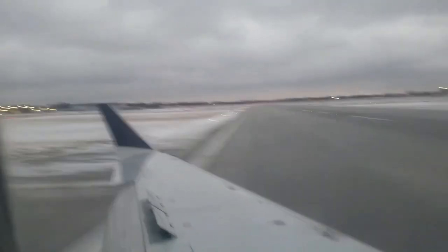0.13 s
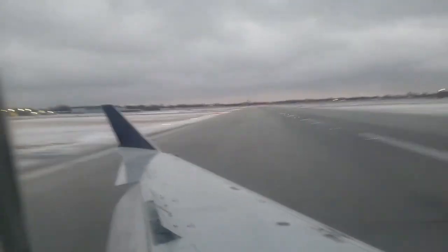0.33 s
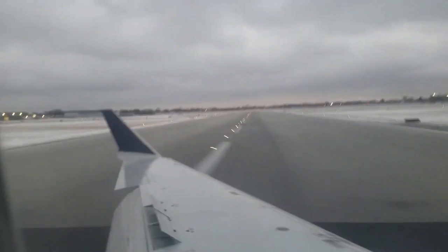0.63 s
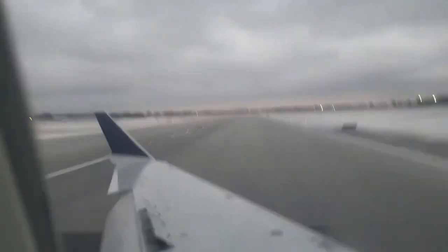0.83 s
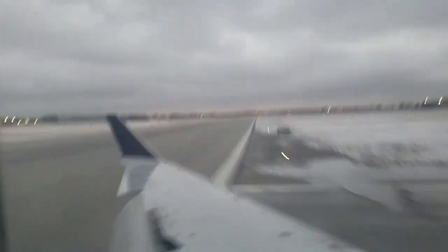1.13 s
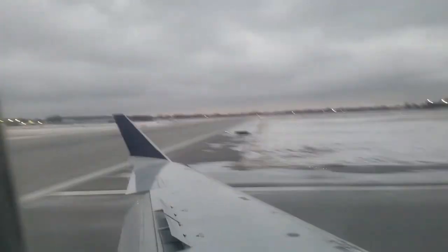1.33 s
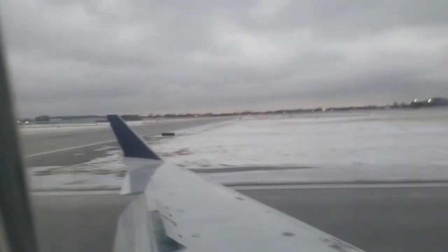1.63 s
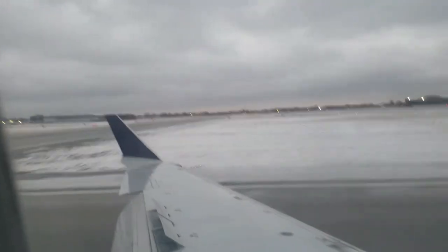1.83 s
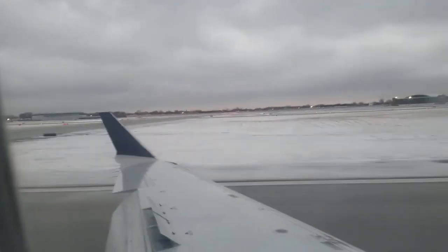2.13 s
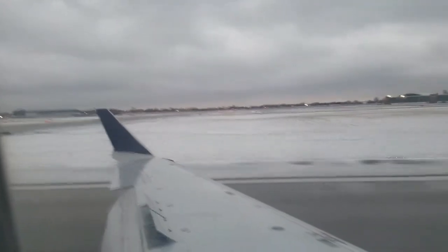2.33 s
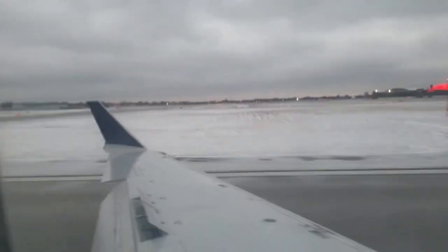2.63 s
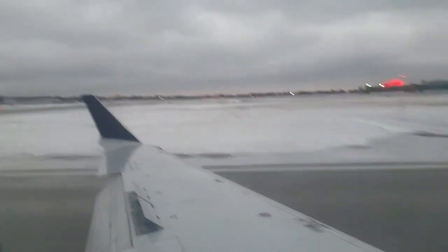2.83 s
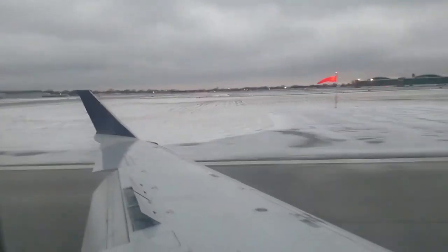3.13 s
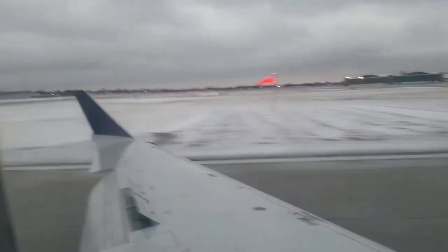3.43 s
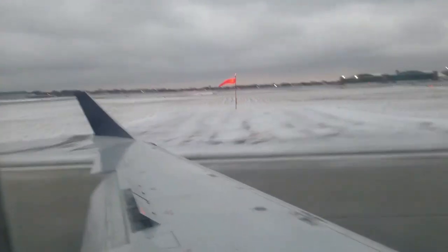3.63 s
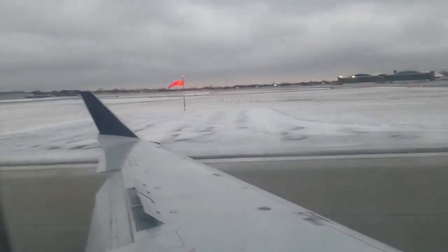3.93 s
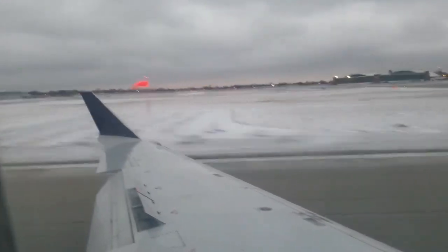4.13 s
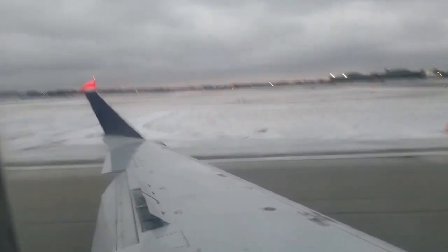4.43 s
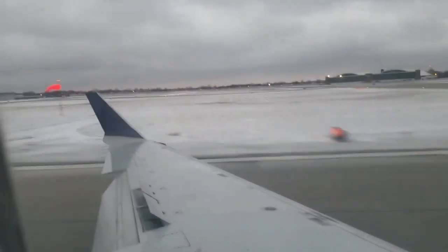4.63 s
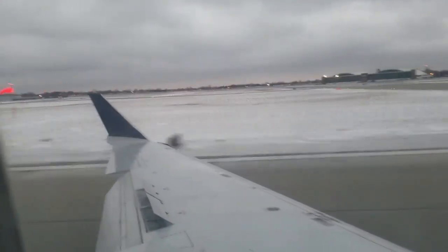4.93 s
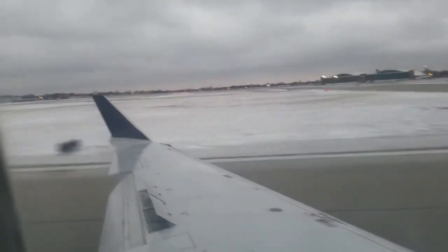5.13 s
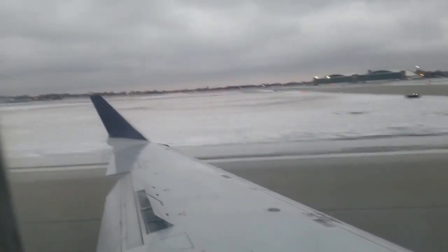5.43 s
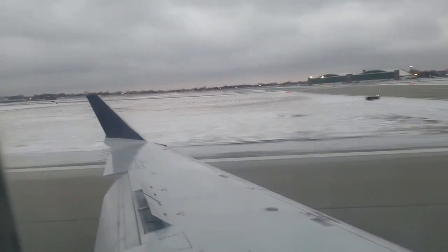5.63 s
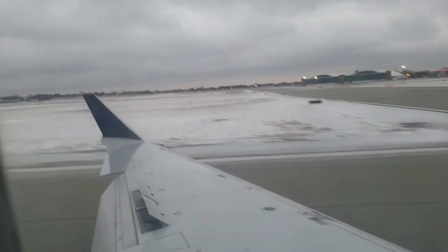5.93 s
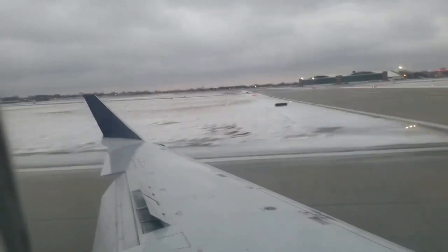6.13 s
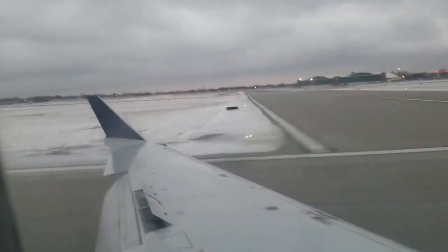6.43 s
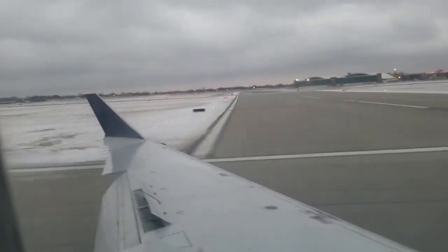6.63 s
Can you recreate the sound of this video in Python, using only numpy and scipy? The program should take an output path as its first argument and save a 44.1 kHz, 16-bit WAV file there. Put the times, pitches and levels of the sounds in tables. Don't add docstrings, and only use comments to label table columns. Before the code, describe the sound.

Deep rolling rumble and sinking wheel drone in an aircraft cabin, vents hissing, machinery whining in slow beats, a sharp jolt at 1.2 seconds.

```python
import sys
import numpy as np
from scipy import signal
from scipy.fft import rfft, irfft, next_fast_len
from scipy.io import wavfile
from scipy.ndimage import uniform_filter1d, map_coordinates

SR = 44100
rng = np.random.default_rng(int(sys.argv[2]) if len(sys.argv) > 2 else 0)


def gain_from_db(level_db):
    decades = np.asarray(level_db, float) / 20
    return 10 ** decades


def to_wav(sig):
    pcm = np.clip(np.atleast_2d(sig), -1, 1) * 32767
    pcm = np.round(pcm).astype(np.int16)
    wavfile.write(sys.argv[1], SR, pcm.T)


N = 298557


def unit(x):
    return x / np.sqrt(np.mean(x ** 2) + 1e-20)


def along(points, hz):
    f, v = np.transpose(points)
    return np.interp(np.log(hz + 1), np.log(f + 1), v)


def spectrum(points):
    return lambda hz: gain_from_db(along(points, hz))


def curves(rows):
    s, *cols = np.transpose(rows)
    return [np.interp(np.arange(N) / SR, s, c) for c in cols]


def wobble(rate):
    at = np.arange(0, N + 64, 64)
    knots = rng.standard_normal(int(N * rate / SR) + 4)
    return np.interp(np.arange(N), at, map_coordinates(knots, [at * rate / SR]))


def filtered(x, response):
    m = next_fast_len(x.shape[-1] + 4096)
    return irfft(rfft(x, m) * response(np.fft.rfftfreq(m, 1 / SR)), m)[..., :x.shape[-1]]


def panned(pan_db):
    return gain_from_db([[pan_db / 2], [-pan_db / 2]])


# f/Hz, left-right level/dB
LEAN = [(40, 2.8), (110, 1.3), (200, -.3), (380, -1), (600, .8), (1050, 5.9), (1380, 3.8), (1800, 12.5),
        (2400, 12.5), (2800, 10), (4100, 9), (4900, 16.5), (5900, 8.5), (8500, 4.3), (10500, 6.6),
        (14000, 1.8)]
# f/Hz, left lead/rad
LEAD = [(30, -.13), (110, -.27), (170, -.17), (230, .1), (370, .45), (640, 1), (760, 0), (960, -2),
        (1300, -2.8), (1500, -2.1), (2000, -.5)]


def ports(hz):
    phase = np.outer([.5, -.5], along(LEAD, hz))
    return gain_from_db(np.outer([.5, -.5], along(LEAN, hz))) * np.exp(1j * phase)


# f/Hz, left-right correlation
ALIKE = [(30, .97), (60, .99), (130, .97), (240, .99), (430, .93), (570, .86), (660, .6), (820, .1),
         (1000, .4), (1300, .45), (1900, .08), (8000, .03), (14000, .25)]


def rush(gain, patchy_db):
    z = signal.stft(rng.standard_normal((2, N)), nperseg=512)[2]
    field = uniform_filter1d(rng.standard_normal(z.shape[1:]), size=6, axis=0)
    field = uniform_filter1d(field, size=10, axis=1)
    pair = signal.istft(z * gain_from_db(patchy_db * unit(field)), nperseg=512)[1][:, :N]

    def mid_side_gain(hz):
        turn = np.arccos(np.clip(along(ALIKE, hz), -1, 1)) / 2
        return gain(hz) * [np.cos(turn), np.sin(turn)]

    mid, side = filtered(pair, mid_side_gain)
    both = filtered(np.array([mid + side, mid - side]), ports)
    return both / np.std(both.mean(0))


def tone(hz, db, pan_db, lead, blur):
    phase = 2 * np.pi * np.cumsum(hz) / SR + blur * wobble(30) + rng.uniform(0, 2 * np.pi)
    pair = panned(pan_db) * np.sin(phase + [[lead / 2], [-lead / 2]])
    return pair * gain_from_db(db) / np.std(pair.mean(0))


HISS_DB, CREEP_DB_PER_S = -43.5, 0.55
DUCK_S, HOLD_S, QUICK_S, SLOW_S = 0.16, 0.38, 0.36, 0.8
LEFT_SHARE = 0.37
# t/s, depth/dB
DUCKS = [
    (-1.5, -3),
    (0.9, 0),
    (1.1757, 13.5),
    (3, 1.5),
    (5, 2),
]


def gain_db():
    t, steps = np.arange(N) / SR, np.cumsum([0, DUCK_S, HOLD_S, QUICK_S, SLOW_S])
    ducked_db = sum(db * np.interp(t - s, steps, [0, .9, 1, LEFT_SHARE, 0]) for s, db in DUCKS)
    return HISS_DB + CREEP_DB_PER_S * t - ducked_db


# t/s, roughness level/dB, tread grip level/dB, wall buzz level/dB
ROLL = [(0, -3, 3, 0), (.25, 1.5, -1, 0), (.5, -1.5, -4, 0.5), (.8, -0.5, -9, -2.5), (1.0, 1.5, -2, 1),
        (1.12, -0.5, 0, 0.5), (1.36, 5.5, -3.5, -1.5), (1.5, 1.5, 4.5, 1.5), (1.8, 0, 6.5, 2.5),
        (1.95, 5.5, 1, -2.5), (2.1, 3, 2.5, 2.5), (2.5, 1, 1, 2.5), (2.9, 1, 0.5, 2),
        (3.3, -0.5, -5.5, 2.5), (3.6, 0.5, -6, 1), (4.4, 1.5, -8.5, 0), (4.8, -3.5, -4.5, 1),
        (5.4, 0, -2.5, -2), (5.9, -2, -2, 0), (6.3, -3.5, -13.5, 0.5), (6.77, -4, -6.5, -1.5)]
# t/s, level over the roll/dB
BUMPS = [
    (0.058, 8),
    (.85, 0.5),
    (1.11, 4.5),
    (2.83, 0.5),
    (3.149, 2.5),
    (3.95, 2),
    (5.43, 0.5),
    (6.42, 4.5),
]
BUMP_S = 0.059


def runway():
    t, (rough_db, grip_db, _) = np.arange(N) / SR, curves(ROLL)
    opened_db = gain_db() - HISS_DB
    heave_db = sum(db * np.exp(-((t - s) / BUMP_S) ** 2) for s, db in BUMPS)
    return opened_db + rough_db, opened_db + grip_db, heave_db


# f/Hz, level/dB per Hz
VENT = [(450, -44.5), (700, -13), (1000, -9), (1300, -12.5), (1830, -19.5), (2100, -22.5), (2730, -22.5),
        (3700, -26), (4400, -25), (4800, -21), (5300, -24), (6000, -30.5), (8600, -40.5), (10500, -39.5),
        (15500, -46.5)]
# f/Hz, width/Hz, level/dB
DUCTS = [(484, 34, 1.5), (577.5, 13, -2), (1417, 16, -15), (1839, 77, -20.5), (2704, 71, -24.5),
         (3130, 87, -26.5)]


def vents(shake):
    hiss_db = gain_db() + 0.37 * shake
    hiss = gain_from_db(hiss_db + 7.5 + 0.74 * wobble(30)) * rush(spectrum(VENT), patchy_db=1.27)

    def duct_gain(f):
        return sum(gain_from_db(db) / (1 + ((f - hz) / width * 2) ** 2) for hz, width, db in DUCTS)

    return hiss + gain_from_db(hiss_db + 12.0) * rush(duct_gain, patchy_db=2.5)


# t/s, rotation/turns per s
WHEEL = [(0.0, 15.81), (1.0, 15.01), (2.0, 13.93), (3.0, 12.96), (4.0, 12.44), (5.0, 11.81), (6.0, 11.36),
         (6.77, 11.31)]
# f/Hz, level/dB per Hz
DRUM = [(120, -30.5), (175, -1), (215, 1.5), (270, -8), (340, -26), (600, -120)]
DRUM_DB_PER_TURN = 3


def floor():
    speed_db = DRUM_DB_PER_TURN * (np.minimum(curves(WHEEL)[0], 14) - 14)
    return gain_from_db(runway()[0] + speed_db - 21.5) * rush(spectrum(DRUM), patchy_db=0.5)


# f/Hz, level/dB per Hz
THUD = [(15, -50), (25, -20.5), (32, -36.5), (40, -3.5), (52, -13), (64, 5.5), (80, -20), (100, -3),
        (130, -37.5), (200, -100)]
# f/Hz, level/dB per Hz
BOOM = [(50, -16), (85, 0), (146, -2), (208, -4.5), (280, -18.5), (360, -31.5), (620, -120)]
# f/Hz, level/dB per Hz
PANEL = [(140, -28), (240, -1.5), (312, -2), (351, -3.5), (427, -3.5), (484, -8), (528, -4), (760, -20),
         (847, -17), (880, -10), (1140, -31), (1940, -120)]
THUD_GROWS = 1.5
BOOM_SHARE, PANEL_SHARE = 0.54, 0.037


def hull(shake):
    rough_db, _, heave_db = runway()
    thud = gain_from_db(THUD_GROWS * rough_db + heave_db - 21) * rush(spectrum(THUD), patchy_db=-1.0)
    boom = gain_from_db(rough_db + BOOM_SHARE * heave_db - 15.0) * rush(spectrum(BOOM), patchy_db=1.2)
    buzz_db = rough_db + curves(ROLL)[2] + PANEL_SHARE * heave_db - 24.0 + 0.28 * shake
    return thud + boom + gain_from_db(buzz_db) * rush(spectrum(PANEL), patchy_db=1.5)


# t/s, level/dB, hold/s
RUSTLES = [
    (3.172, -42, .012),
    (3.352, -42, .012),
    (6.048, -34, .036),
]
BRUSH_IN_S, BRUSH_OUT_S = .01, .022


def cloth():
    t = np.arange(N) / SR
    fibres = [(1200, -26), (2700, -2), (5200, -2.0), (6500, -15), (9000, -28), (12000, -31)]
    noise = rush(spectrum(fibres), patchy_db=1.5) * gain_from_db(4 * wobble(260))
    stroke = 0
    for s, db, hold in RUSTLES:
        steps = np.cumsum([0, BRUSH_IN_S, hold, BRUSH_OUT_S])
        stroke = stroke + gain_from_db(db) * np.interp(t - s, steps, [0.099, 1, 0.82, 0.082]) ** 2
    return noise * stroke


# t/s, peak level/dB, top-band level/dB, left-right level/dB
TICKS = [(.0054, -25, -14, 25), (.0664, -25.5, -11, 7.5), (.0712, -19.5, -17, 15), (.0745, -26, -24, 20),
         (.079, -25.5, -30, 14), (.1416, -23, -20, 12), (.1565, -22, -20, 14), (.197, -26.5, -35, 17),
         (.4015, -30.5, -17, 14), (.459, -33.5, -18, 12), (.6025, -37, -16, 8), (.7135, -33, -14, 13),
         (.8615, -33, -7, 8), (1.1105, -24, -24, 15), (1.1515, -28, -15, 14), (1.2016, -29.5, -12.5, 6),
         (1.208, -32, -9.5, 12.5), (1.2131, -19, -15, 13), (1.2155, -24.5, -16.5, 10.5),
         (1.218, -28.5, -17.5, 13.5), (1.2265, -30.5, -16.5, 11.5), (1.2544, -40, -9.5, 13),
         (1.261, -41, -10, 10), (1.2685, -27, -14, 7), (1.2805, -39, -9.5, 0), (1.345, -36, -18.5, 13),
         (1.906, -39.5, -12, 8), (2.045, -31, -28, 17), (2.203, -31.5, -21, 9), (2.214, -38, -16, 5),
         (2.9415, -34, -8, 5), (3.1835, -25.5, -22, 12), (3.3124, -35, -5, 8), (3.3618, -24, -30, 14),
         (4.5604, -37, -11, 10), (4.803, -28.5, -32, 14), (5.1372, -27, -31, 10), (6.053, -30.5, -24, 11),
         (6.059, -29, -24, 12), (6.064, -30.5, -22.5, 10), (6.087, -28, -30, 10), (6.3082, -31, -20, 14)]
TICK_T60 = .013


def trim():
    out, t = np.zeros((2, N + SR)), np.arange(SR // 10) / SR
    envelope = gain_from_db(-60 * t / TICK_T60) * (1 - np.exp(-t / 0.00036))
    for s, db, top_db, pan_db in TICKS:
        shared = rng.standard_normal(len(t))
        burst = envelope * (shared + 1.5 * rng.standard_normal((2, len(t))))
        colour = [(700, -13.5), (2000, -2), (3500, -6.5), (5000, 2.2), (7000, -14.5),
                  (9000, top_db + 1), (15000, top_db - 5)]
        burst = filtered(np.pad(burst, ((0, 0), (64, 0))), spectrum(colour))
        burst *= 3.4 / np.linalg.norm(burst)
        out[:, round(s * SR) - 64:][:, :burst.shape[1]] += gain_from_db(db + 5) * panned(pan_db) * burst
    return out[:, :N]


def beat_db(times, match, pull):
    times = np.r_[2 * times[0] - times[1], times, 2 * times[-1] - times[-2]]
    slip = 2 * np.pi * np.interp(np.arange(N) / SR, times, np.arange(len(times)))
    return 20 * np.log10(np.abs(1 - match * np.exp(1j * (slip + pull * np.sin(slip)))))


# t/s, f/Hz
PUMP_HZ = [(0, 910), (.6, 899), (2, 894), (3.2, 898), (3.6, 903), (4.4, 905.5), (5.2, 904), (5.8, 907),
           (6.3, 903), (6.77, 904)]
# t/s, level over the hiss/dB
PUMP_LOAD = [(0, 2.5), (.25, 9), (.55, 7.5), (.75, -2.5), (1, 3), (1.4, 2.5), (2.5, 3.5), (3.5, 9.5),
             (3.95, 7.5), (4.3, 10), (4.9, 7), (5.5, 8), (5.9, 10.5), (6.77, 10.5)]
# t/s, weaker over stronger amplitude
PUMP_BEATS = [(.02, .85), (.45, .75), (.81, .9), (.92, .6), (1.08, .9), (1.36, .9), (1.72, .9), (2.06, .75),
              (2.24, .6), (2.42, .7), (2.84, .6), (3.16, .4), (3.35, .8), (3.85, .75), (4.03, .65),
              (4.59, .8), (5.31, .75), (5.7, .85), (6.1, .5), (6.47, .25), (6.79, .8)]
GENERATOR_BEATS = [.06, .18, .44, .61, .8, 1, 1.26, 1.5, 1.85, 2.28, 2.48, 2.6, 2.72, 2.84, 3.02, 3.2, 3.38,
                   3.59, 3.82, 4.1, 4.4, 4.6, 4.83, 5.06, 5.35, 5.58, 5.8, 6.16, 6.45, 6.65]
GENERATOR_HZ, GENERATOR_MATCH = 1193.7, .76
PUMP_PULL, GENERATOR_PULL = .75, .3
# t/s, f/Hz, level/dB
SPOOL = [
    [(3.2, 971, -59), (3.5, 925, -37), (3.9, 940, -50), (4.1, 947, -57)],
    [(4.3, 1220, -58), (4.6, 1257, -60), (5.1, 1178, -43.5), (6, 1180, -42), (6.77, 1190, -50)],
    [(5, 874, -66), (5.3, 859, -39), (6, 831, -50), (6.4, 787, -54)],
    [(2.15, 1438, -50), (2.3, 1468, -48.5), (2.55, 1495, -50.5), (2.75, 1478, -53), (3, 1448, -43),
     (3.1, 1466, -56)],
]
# t/s, f/Hz, level/dB
HUMS = [
    [(.2, 384, -40), (.9, 382, -33), (1.25, 378, -36), (1.7, 373, -38.5), (2.2, 377, -38), (2.5, 372, -45)],
    [(3.6, 489, -42), (4.3, 489, -31), (4.7, 486, -29), (5.3, 488, -31), (5.7, 486, -40)],
    [(5.9, 137.5, -35), (6.05, 137, -18), (6.2, 136, -19), (6.35, 135, -35)],
]
# t/s, f/Hz, level/dB
RUNDOWN = [(1.3, 1088, -57), (1.6, 1070, -56), (1.72, 1055, -62), (1.85, 1040, -57), (2.15, 1020, -54)]


def whine():
    pump_hz = curves(PUMP_HZ)[0]
    pump_db = gain_db() + curves(PUMP_LOAD)[0] + 0.9 * wobble(16)
    pump_db = pump_db + beat_db([s for s, _ in PUMP_BEATS], curves(PUMP_BEATS)[0], PUMP_PULL)
    gen_hz = GENERATOR_HZ + 0.89 * wobble(1.5)
    gen_db = gain_db() - 0.5 + beat_db(GENERATOR_BEATS, GENERATOR_MATCH, GENERATOR_PULL)
    out = tone(pump_hz, pump_db - .2, pan_db=6.5, lead=-0.24, blur=0.11)
    out += tone(2 * pump_hz, pump_db - 21, pan_db=13.5, lead=-0.3, blur=0.45)
    out += tone(gen_hz, gen_db, pan_db=6.5, lead=2.05, blur=0.36)
    out += tone(2 * gen_hz, gen_db - 17, pan_db=14, lead=-1.7, blur=.4)
    pans_db = (3.5, -1.5, -14, 9.5, -3.5, 1.0, 2.5, 4.5)
    for rows, pan_db in zip(SPOOL + HUMS + [RUNDOWN], pans_db):
        (first_s, first_hz, _), (last_s, last_hz, _) = rows[0], rows[-1]
        fade_in, fade_out = (first_s - .1, first_hz, -110), (last_s + .1, last_hz, -110)
        hz, db = curves([fade_in] + rows + [fade_out])
        out += tone(hz, db, pan_db, lead=.3, blur=0.29)
    return out


# t/s, level/dB, sharpness f/Hz
KNOCKS = [
    (1.2021, -1, 5000),
    (1.218, -11, 1500),
]
# f/Hz, level/dB, t60/s
CASE = [(235, -1, 0.045), (413, -3, 0.03), (786, -10, 0.018), (1370, -19, 0.03), (2350, -5.5, 0.015)]


def jolt():
    out, t = np.zeros(N + SR), np.arange(SR // 10) / SR
    ring = -sum(gain_from_db(db - 60 * t / t60) * np.cos(2 * np.pi * hz * t) for hz, db, t60 in CASE)
    for s, db, edge_hz in KNOCKS:
        knock = filtered(ring, lambda hz: 1 / (1 + 1j * hz / edge_hz) ** 2)
        out[round(s * SR):][:len(t)] += gain_from_db(db - 1.5) * knock
    far = filtered(out[:N], lambda hz: -gain_from_db(-19) / (1 + 1j * hz / 1500) ** 2)
    return np.array([far, out[:N]])


# f/Hz, width/Hz, level/dB
HULL_MODES = [(100, 3.8, 0), (110.4, 6.4, 4), (117, 5.1, 3.5), (125.1, 2.7, -0.5), (141.4, 7.6, 5),
              (149.1, 8.3, 3), (175.9, 12.3, -1), (191.1, 15.2, -3.5), (215.3, 11, -0.5), (241.4, 14, -9)]
TREAD_DB = [-17, -17.5, -20.5, -19.5]
# order, level/dB
FAVOURED = [(13, 4), (15, 2), (19, 5), (20, 7), (25, 7), (26, 4), (32, 6)]


def tyres():
    turns, (rough_db, grip_db, heave_db) = curves(WHEEL)[0], runway()
    angle = 2 * np.pi * np.cumsum(turns) / SR + 0.0015 * wobble(26)

    def modes(f):
        peaks = (gain_from_db(db) / (1 + ((f - hz) / width * 2) ** 4) for hz, width, db in HULL_MODES)
        return gain_from_db(-12.5) + sum(peaks)

    drone, tread_orders = 0 * turns, (8, 12, 14, 16)
    for k, db in zip(tread_orders, TREAD_DB):
        level_db = db + 3.6 + grip_db + 1.4 * wobble(9)
        drone += gain_from_db(level_db) * modes(k * turns) * np.sin(k * angle + k * k)
    for k in sorted(set(range(7, 34)) - set(tread_orders)):
        coupling_db = 0.62 * np.maximum(along(BOOM, k * turns), -18) + dict(FAVOURED).get(k, 0)
        level_db = rough_db + BOOM_SHARE * heave_db - 32.5 + coupling_db + 3.1 * wobble(3.5)
        drone += gain_from_db(level_db) * np.sin(k * angle + k * k)
    return filtered(drone, ports)


def scene():
    shake = wobble(17)
    return vents(shake) + floor() + hull(shake) + cloth() + trim() + whine() + jolt() + tyres()


# f/Hz, share of spectral lines lost
STARVED = [(5200, 0), (6300, .06), (7700, .17), (8000, .42), (9200, .42), (9700, .18), (11700, .29),
           (13200, .41), (14500, .51), (15400, .68)]


def starve(x):
    hop, start = 1024, 2048 - 74
    n, k = np.arange(2 * hop) + .5, np.arange(hop) + .5
    window = np.sin(np.pi * n / hop / 2)[:, None]
    basis = window * np.cos(np.pi / hop * np.outer(n + hop / 2, k)) * np.sqrt(2 / hop)
    mid_side = np.array([[1, 0.71], [1, -1.016]]) / np.sqrt(2)
    padded = np.pad(mid_side @ x, ((0, 0), (start, 3 * hop - (N + start) % hop)))
    blocks = padded.reshape(2, -1, hop)
    lines = np.concatenate([blocks[:, :-1], blocks[:, 1:]], axis=2) @ basis
    need = uniform_filter1d(rng.standard_normal(lines.shape[1:]), size=9, axis=1)
    need = uniform_filter1d(need, size=2, axis=0)
    rank = need.argsort(axis=0).argsort(axis=0) / len(need)
    treble = np.log(np.mean(lines[:, :, hop // 4:] ** 2, axis=(0, 2)) + 1e-12)
    calm = treble < signal.medfilt(treble, 15) + .8
    share = np.minimum(np.outer([1, 1.45], along(STARVED, k * SR / hop / 2)), .8)
    share = share[:, None] * calm[:, None]
    frames = (lines * (rank >= share)) @ basis.T
    joined = (frames[:, 1:, :hop] + frames[:, :-1, hop:]).reshape(2, -1)
    return mid_side @ joined[:, start - hop:][:, :N]


def band_limit(x):
    return signal.sosfilt(signal.butter(12, 15790, fs=SR, output="sos"), x)


def record(dry):
    top = 1.15
    clipped = dry / (1 + np.abs(dry / top) ** 6) ** (1 / 6)
    mix = starve(clipped)
    return band_limit(mix)


dry = scene()
out = record(dry)
to_wav(out)
```